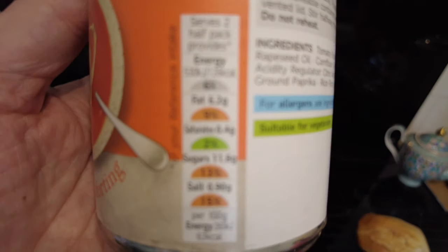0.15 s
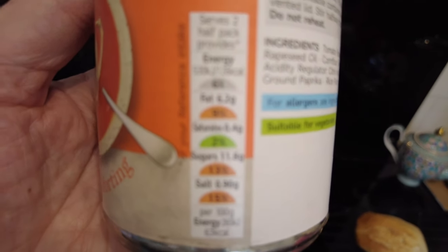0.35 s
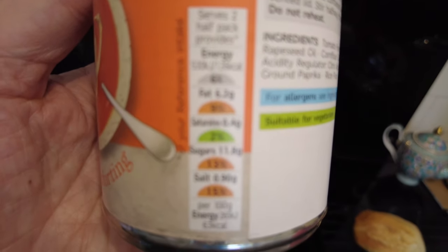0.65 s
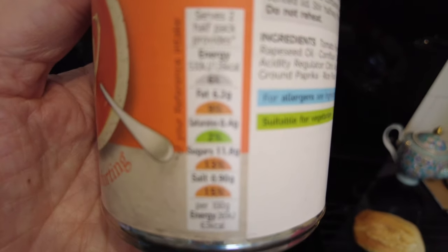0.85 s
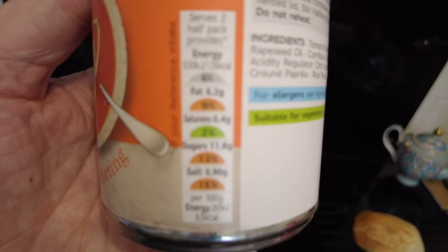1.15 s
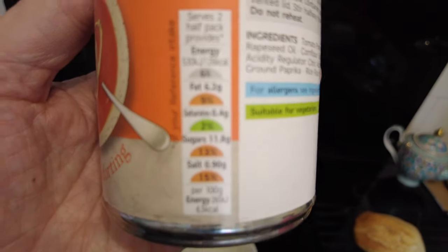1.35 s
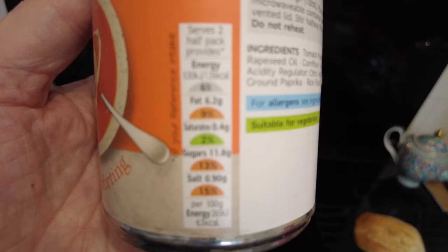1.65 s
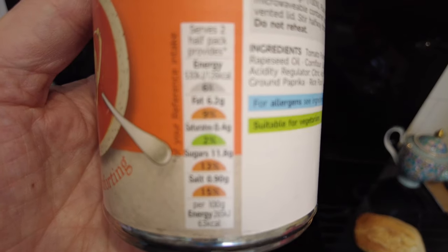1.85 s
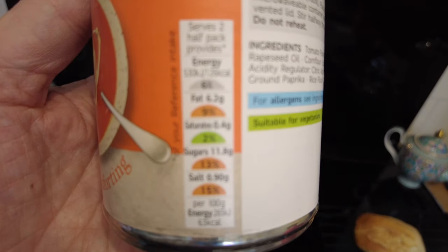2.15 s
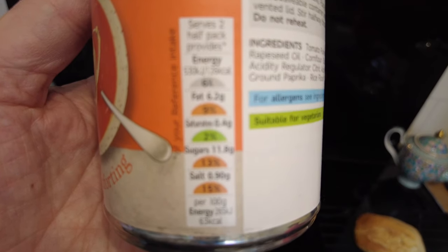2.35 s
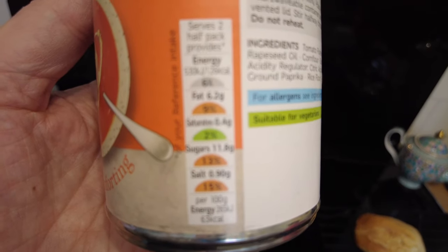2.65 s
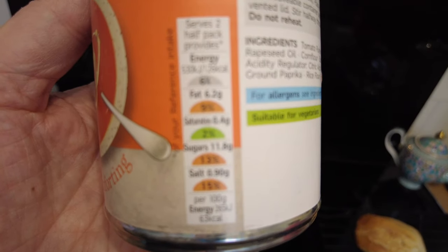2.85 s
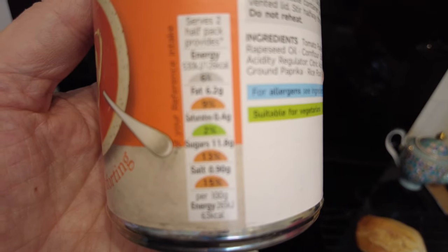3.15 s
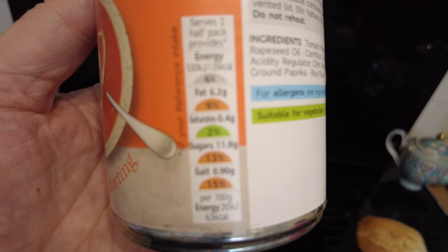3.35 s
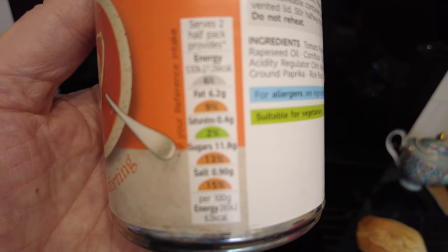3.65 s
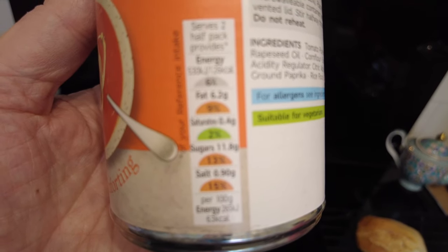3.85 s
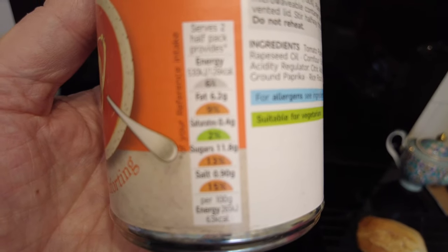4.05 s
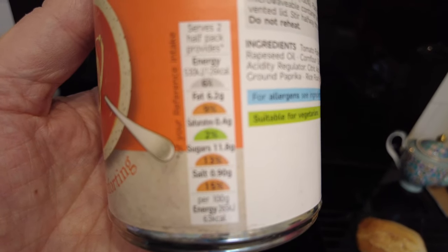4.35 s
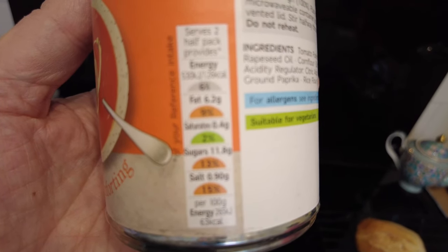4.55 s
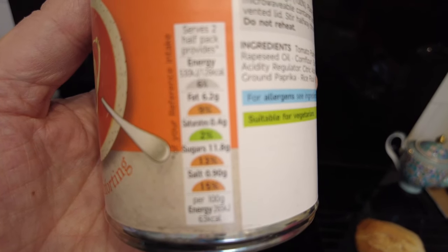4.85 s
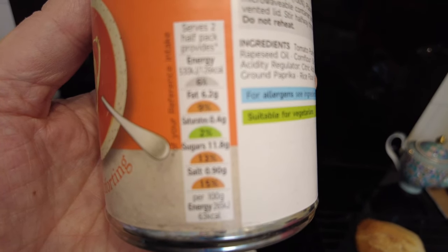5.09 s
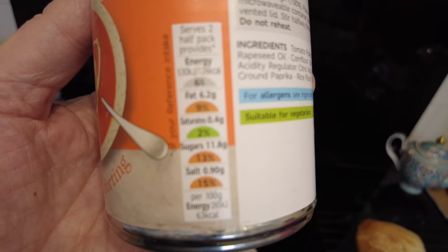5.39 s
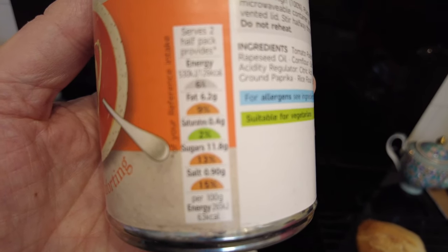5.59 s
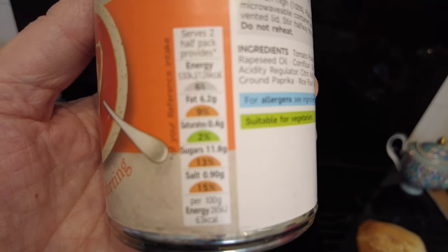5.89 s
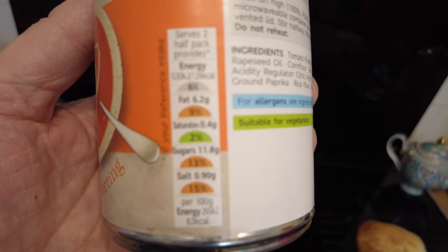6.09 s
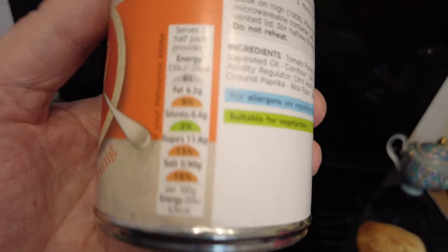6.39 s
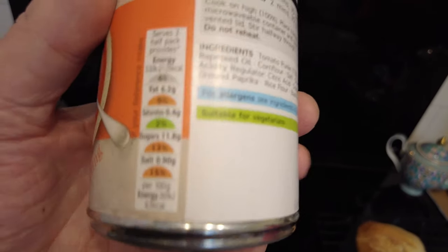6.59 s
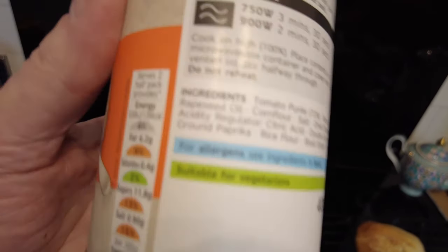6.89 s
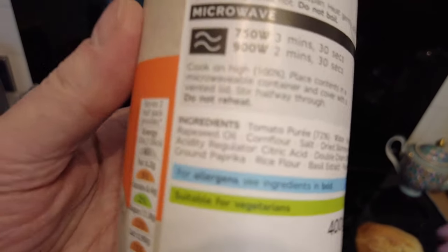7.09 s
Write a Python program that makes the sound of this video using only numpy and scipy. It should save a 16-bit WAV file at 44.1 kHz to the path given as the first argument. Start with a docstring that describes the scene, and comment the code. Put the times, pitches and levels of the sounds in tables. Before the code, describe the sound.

Close, scattered metallic clicks and soft knocks come from a full tin being handled, with a low electrical hum underneath.

```python
"""Light, ringing ticks come from a full soup tin turned slowly in one hand, close by in a small room. Fingers
stick and let go on the paper label, and each release excites the modes of the metal wall. Dull knocks come as
the grip shifts, and the paper label crinkles now and then with short dry clicks. Near the end skin slides over
the label with a soft swish and a dry snap, and the rim sings faintly. A mains hum and a low room rumble lie
under it all."""
import sys
import numpy as np
from scipy import signal
from scipy.fft import rfft, irfft, next_fast_len
from scipy.io import wavfile
from scipy.ndimage import uniform_filter1d

SR = 44100
rng = np.random.default_rng(int(sys.argv[2]) if len(sys.argv) > 2 else 0)


def waveform_to_disk(signal):
    """Save audio, clipped to [-1, 1], as 16-bit WAV at the path in sys.argv[1]."""
    frames = np.transpose(np.atleast_2d(signal))
    scaled = np.clip(frames, -1, 1) * 32767
    samples = np.round(scaled).astype(np.int16)
    wavfile.write(sys.argv[1], SR, samples)


N = 318843
TIME = np.arange(N) / SR
HIT_TIME = np.arange(16384) / SR
TICK_BAND_HZ, KNOCK_BAND_HZ = (1000, 5000), (200, 900)  # bands in which levels are set

# modes of the tin, many in close clusters: f/Hz, level/dB, T60/s
TIN_MODES = [(1292, -5.5, .28), (1497, -9, .11), (1745, -15, .18), (2121, -11, .26), (2213, -11, .18),
             (3144, -12, .2), (3275, -5, .19), (3518, -11, .14), (4725, -1, .15), (4780, -5, .14),
             (4840, -3, .15), (4900, -5, .13), (5800, -16, .25), (6190, -7, .2), (6228, -6, .18),
             (6495, -3, .14), (7980, 3.5, .16), (8027, 6, .17), (8280, .5, .14), (9986, 0, .14),
             (10060, 5, .17), (10370, 0, .13), (12210, 1, .12), (12520, -1, .15), (12980, -3, .14),
             (14680, -6, .13), (15600, -4, .14)]


def ticks(gain_db=16, flex_db=-9, flex_hz=1120, flex_width_hz=320, flex_lead_s=.007):
    """Impulse excitation: each release of skin clicks and rings the metal, the more so the harder it is."""
    # releases: t/s, level/dB, treble/dB, f/Hz of the struck spot, low body/dB, metal ring/dB
    releases = [(0.2424, -32, -21.5, 1400, 7, 5), (0.2672, -31.5, -14.5, 1360, -8, -6),
                (0.562, -40.5, -19, 1600, 7, -10), (.587, -33.5, -19, 1440, -10, -1),
                (.602, -26.5, -14, 8000, -15, -1.5), (1.158, -46.5, 1, 1330, -11, 2),
                (1.202, -45, -1, 4530, -13, -3), (1.580, -34.5, -10, 1390, -12, -4),
                (1.596, -38, -10, 1400, -10, 14), (1.636, -28.5, -11, 1480, -5, 4),
                (1.7017, -16, -15, 1540, 6, -7.5), (1.731, -30, -8, 1500, -9, -3),
                (1.778, -33.5, -18, 2100, -12, 13), (2.128, -28.5, -10, 1560, -7, 2),
                (2.145, -29.5, -10.5, 1710, 22, 15), (2.1757, -15.5, -11.5, 1740, 20.5, 4.5),
                (1.342, -50, 2.5, 1400, -10, 0), (1.422, -43, -10, 5500, -8, -4),
                (1.471, -43, -2, 1400, -6, -4), (2.523, -40, -26, 1500, -6, -2),
                (2.610, -19, -14, 1600, -2, 4), (3.281, -39, -14, 1350, -10, 14),
                (3.3106, -26, -6, 1450, 6, 6), (3.3714, -17, -12.5, 1500, 10, -6),
                (3.640, -41, -4, 1270, -17, 11), (3.656, -36, -3.5, 3300, -7, 4),
                (3.774, -36.5, -22, 3250, -1, 7), (4.348, -33, -15.5, 2140, 0, 7.5),
                (5.226, -39.5, -22, 935, 22, -12), (4.916, -41, -9, 3230, -8, 5),
                (5.165, -32, -7.5, 2420, -14, 3), (5.651, -41, -2.5, 1550, 18, -13),
                (5.520, -53, 5, 1500, -8, -2), (6.025, -45, -4.5, 1300, -14, 1),
                (6.112, -45, 1, 2100, -10, 9), (6.158, -41.5, -19, 1350, -5, -2),
                (6.823, -38, -18, 1290, -15, -9)]
    # spectrum of a click: f/Hz, level/dB
    click_spectrum = [(100, -2), (400, -6), (950, -19.5), (1300, 0), (1700, -5), (2600, -6), (3500, -10),
                      (4200, -9.5), (5000, -11.5), (7000, -10), (11000, -7.5), (16000, -9)]
    flex_spectrum = [(flex_hz / 2, -50), (flex_hz - flex_width_hz / 2, -6), (flex_hz, 0),
                     (flex_hz + flex_width_hz / 2, -6), (flex_hz * 2, -60)]
    # the wall radiates best around its strong upper modes
    wall = humps([(hz, 170, 6) for hz, db, _ in TIN_MODES if hz > 3000 and db > -8])
    out = np.zeros((2, N))
    for s, db, treble, spot_hz, body, metal in releases:
        top_loss_db = .42 * max(db + 32, 0)
        tilt = [(450, 0), (650, body / 2), (1000, body), (1300, 0), (2000, 0),
                (4800, min(treble + 16, 0)), (9000, treble), (10500, treble), (12500, treble - top_loss_db)]
        spot = humps([(spot_hz, 380, 9.5)])
        click = unit_band(colour(crack(), click_spectrum, tilt, wall, spot), TICK_BAND_HZ)
        ringing = colour(ring(TIN_MODES), tilt, spot) * amp(metal + .37 * (db + 11))
        add(out, s, amp(db + gain_db) * unit_band(click + ringing, TICK_BAND_HZ))
        # under a hard grip the wall bows with a brief, low note just before it clicks
        flex = colour(room(direct=0, rise_s=.0039, early=3.2, early_s=.0088), flex_spectrum)
        flex /= np.linalg.norm(flex[0])
        add(out, s - flex_lead_s, amp(db + gain_db + flex_db + min(db + 9.5, 0)) * flex)
    return out * amp([[-.86], [.86]])


def knocks(gain_db=18.5, touch_db=-19, metal_db=-19, crack_db=-6, hollow_db=-2):
    """Soft impact: the longer the contact, the more of the thud's energy lies at low frequencies."""
    # blows: t/s, level/dB, hardness/dB, hollow ring/dB, f/Hz favoured by the spot
    blows = [(0.604, -25, -43, -9, 340), (1.519, -27.5, -51, -8, 320), (2.092, -26, -48, -3.5, 240),
             (2.612, -40, -8.5, 6.5, 377), (2.8052, -15.5, -29.5, 3, 322), (3.087, -31, -42, 1, 535),
             (3.397, -14.5, -28, 1, 487), (3.831, -18, -27, 3.5, 870), (5.673, -29.5, -35.5, -4, 520)]
    # spectrum of the thud: f/Hz, level/dB
    thud_spectrum = [(50, -52), (170, 1.5), (250, -1), (330, 6.5), (460, 1.5), (580, 7.5), (700, -4),
                     (900, 2), (1150, 2.5), (1400, 10), (1900, -5), (2200, 2.5), (2600, -12), (3100, -14.5),
                     (3500, -7), (4200, -29), (4800, -21), (6500, -45), (15000, -56)]
    # the rim's brief crack at the start of a knock: f/Hz, level/dB
    crack_spectrum = [(600, -34), (1500, -2), (2200, 2), (2800, -1), (3400, 0), (4200, -21), (4800, -6),
                      (6000, -25), (15000, -45)]
    # low resonances under a knock: f/Hz, level/dB, T60/s
    hollow_modes = [(117, 0, .3), (242, -9, .35), (323, 2, .25), (380, -13, .4), (481, -4, .24),
                    (549, -4.5, .24), (650, -8, .25), (741, -9, .3), (853, -8, .3), (900, -13, .26),
                    (945, -11, .26), (1030, -16, .2), (1387, -15, .2), (1780, -21, .2)]
    out = np.zeros((2, N))
    for s, db, hardness, hollow, spot_hz in blows:
        gain, treble_db = amp(db + gain_db), hardness + 17.5
        path = room(direct=.12, rise_s=.003, early=.9, early_s=.025, spacing_m=.1)
        low_body = humps([(240, 200, .63 * max(-28 - hardness, 0))])
        thud = colour(path, thud_spectrum, [(450, 0), (1500, treble_db)], low_body)
        touch_path = room(direct=0, rise_s=.00052, early=1, early_s=.02)
        touch = colour(touch_path, [(200, -5), (900, 15), (1400, -3), (2500, -28)])
        metal = colour(ring(TIN_MODES), [(2300, 7.5), (3500, -4), (5000, -5), (7000, -30)])
        edge = colour(crack(), crack_spectrum)
        hollow_ring = colour(ring(hollow_modes, scatter_db=1), humps([(spot_hz, 110, 5)]))
        add(out, s - .01, gain * amp(touch_db) * unit_band(touch, KNOCK_BAND_HZ))
        add(out, s, gain * (unit_band(thud, KNOCK_BAND_HZ) + amp(metal_db) * metal))
        add(out, s + .0025, gain * amp(crack_db + treble_db) * unit_band(edge, TICK_BAND_HZ))
        add(out, s + .00641, gain * amp(hollow_db + hollow) * hollow_ring)
    return np.array([np.roll(out[0], 18), out[1]])  # arrives 18 samples later on the left


def cricks(gain_db=16):
    """Damping broadens resonances: the paper label crinkles under a fingertip and clicks with no long ring."""
    # crinkles of the label: t/s, level/dB, treble/dB
    crinkles = [(4.686, -39, -23), (4.939, -29.5, -9), (4.9796, -25, -3.5)]
    # spectrum of a crick: f/Hz, level/dB
    spectrum = [(300, -17), (1000, -21), (1250, 4.5), (1800, -3.5), (2000, -8.5), (4500, -10),
                (9000, -17.5), (16000, -19)]
    # resonances of the crinkling label: f/Hz, width/Hz, level/dB
    resonances = [(1600, 400, 7.5), (2600, 600, 6), (6100, 340, 15.5), (7650, 400, 11)]
    out = np.zeros((2, N))
    for s, db, treble in crinkles:
        crick = colour(crack(), spectrum, humps(resonances), [(2000, 0), (6000, treble)])
        add(out, s, amp(db + gain_db) * unit_band(crick, TICK_BAND_HZ))
    return out


def grip(gain_db=-3, slips_per_s=110, spread_db=4, ring_db=-13, spots=6):
    """Stick-slip friction: skin creeps over the paper in tiny random slips that faintly ring the tin."""
    # spells of creeping: start t/s, end t/s, level/dB
    creeps = [(.01, .03, -54), (.40, .46, -55.5), (1.20, 1.23, -53), (1.34, 1.48, -55), (1.645, 1.66, -46),
              (1.74, 1.79, -50), (2.44, 2.59, -52.5), (2.74, 2.75, -53.5), (3.04, 3.06, -60),
              (3.20, 3.25, -50), (3.28, 3.38, -45.5), (3.68, 3.84, -57.5), (4.19, 4.23, -58),
              (5.02, 5.09, -54.5), (5.56, 5.60, -55), (5.79, 5.82, -56.5), (6.08, 6.18, -51),
              (6.79, 6.85, -50.5)]
    # spectrum of a slip: f/Hz, level/dB
    spectrum = [(300, -31), (900, 3.5), (1400, 8), (3000, 1), (7000, -3.5), (12000, -9), (16000, -5)]
    onsets = rng.random(N) < slips_per_s / SR
    slips = onsets * amp(spread_db * np.minimum(rng.exponential(1, N), 3.5))
    spot, out = rng.integers(0, spots, N), 0
    for k in range(spots):
        path = colour(room(direct=.4, rise_s=.00095, early=1, early_s=.018), spectrum)
        response = path / np.linalg.norm(path[0]) + amp(ring_db) * ring(TIN_MODES)
        out = out + signal.oaconvolve((slips * (spot == k))[None], response, axes=1)[:, :N]
    return amp(gain_db) * strokes(creeps, rise_db_per_s=227, fall_db_per_s=165) * unit(out)


def slide(gain_db=5):
    """Sliding friction: dry skin on smooth paper makes a fine, bright hiss."""
    # strokes over the label: start t/s, end t/s, level/dB
    swishes = [(6.46, 6.54, -48.5), (7.0, 7.12, -54.5)]
    # spectrum of the friction noise: f/Hz, level/dB
    spectrum = [(500, -15), (2000, -8.5), (4500, -11), (8000, -8), (12000, -5), (14200, -2.5),
                (15500, -1.5)]
    hiss = unit(colour(rng.standard_normal((2, N)), spectrum))
    envelope = strokes(swishes, rise_db_per_s=103, fall_db_per_s=90)
    return amp(gain_db) * envelope * hiss * amp([[.3], [-.3]])


def snap(at_s=6.5248, gain_db=-7.5):
    """Sudden release: the label lets go of the sliding finger, too lightly to ring the tin."""
    # spectrum of the thin, dry snap: f/Hz, level/dB
    spectrum = [(500, -32), (3900, -21), (5000, -3), (6200, 1), (7000, -9), (8700, -4), (10000, -15),
                (16000, -14)]
    out = np.zeros((2, N))
    path = room(direct=1.9, rise_s=.002, early=6, early_s=.007)
    add(out, at_s, amp(gain_db) * colour(path, spectrum))
    return out


def rim(modes_hz=(1292, 2105), width_hz=16, side_share=.4, ping_db=25, t60_share=.85):
    """Forced and free vibration: friction drives two modes; a catching fingertip leaves a damped ping."""
    # a finger dragging on the rim: start t/s, end t/s, level/dB
    drags = [(6.09, 6.27, -60), (6.82, 6.84, -60)]
    # fingertips catching the rim: t/s, level/dB
    catches = [(.269, -48), (.604, -39.5), (6.031, -52), (6.088, -55), (6.118, -54), (6.165, -50),
               (6.2, -52), (6.247, -48), (6.263, -40), (6.511, -47.5)]
    # a soft fingertip stirs mostly the lowest mode: f/Hz, level/dB
    ping_spectrum = [(1000, 13), (1340, 12), (1480, -3), (2100, -3), (3250, -6), (3550, -3), (4700, -11),
                     (6300, -12), (8000, -22), (15000, -36)]
    radius, singing = np.exp(-np.pi * width_hz / SR), 0
    for hz in modes_hz:
        resonator = [1, -2 * radius * np.cos(2 * np.pi * hz / SR), radius ** 2]
        singing = singing + unit(signal.lfilter([1, 0, -1], resonator, rng.standard_normal((2, N))))
    mid, side = singing
    envelope = strokes(drags, rise_db_per_s=250, fall_db_per_s=253)
    out = envelope * (mid + side_share * np.array([side, -side]))
    damped = [(hz, db, t60 * t60_share) for hz, db, t60 in TIN_MODES]
    for s, db in catches:
        add(out, s, amp(db + ping_db) * colour(ring(damped, scatter_db=.5, apart=.4), ping_spectrum))
    return out


def ring(modes, detune=.002, scatter_db=2.2, apart=1, rise_s=.0025):
    """Modal decay: damped sines, varying in strength with each blow and bent in pitch by the grip."""
    t, out = HIT_TIME, 0
    for hz, db, t60 in modes:
        # short waves reach the two microphones differently, long ones alike
        mic_phase, mic_db = apart * min(hz / 1200, 2) * rng.uniform(-1, 1, (2, 2, 1))
        strength = amp(db + scatter_db * rng.standard_normal() + mic_db)
        turns = hz * (1 + detune * rng.uniform(-1, 1)) * t + rng.random()
        out = out + strength * amp(-60 * t / t60) * np.sin(2 * np.pi * turns + mic_phase)
    out = out * (1 - np.exp(-t / rise_s))
    return out / np.sqrt((out ** 2).sum() / 2)


def crack(echo_s=.0043, echo_gain=.63):
    """Reflection: a sharp release of the wall sounds in the room and echoes off the hand behind the tin."""
    click, echo = (room(direct=.3, rise_s=.0016, early=2, early_s=.009) for _ in range(2))
    add(click, echo_s, echo_gain * colour(echo, [(3000, 0), (6000, .5), (12000, -1)]))
    return click


def room(direct, rise_s, early, early_s, spacing_m=.22):
    """Impulse response of the room: direct sound, a cluster of near reflections and a short tail."""
    # reverberation time: f/Hz, T60/s
    decay_times = [(150, 0.22), (500, 0.31), (1500, 0.28), (5000, 0.32), (15000, 0.37)]
    t = HIT_TIME
    field = diffuse(rng.standard_normal((2, len(t))), spacing_m)
    hz, frame_s, frames = signal.stft(field, SR, nperseg=256)
    decay = amp(-60 * frame_s / read(decay_times, hz)[:, None])
    tail = signal.istft(frames * decay, SR, nperseg=256)[1][:, :len(t)]
    tail *= (1 - np.exp(-t / rise_s)) * (1 + early * np.exp(-t / early_s))
    # the first reflections arrive in separate clumps, the later ones merge
    clumps = unit(uniform_filter1d(rng.standard_normal(len(t)), size=30))
    tail *= amp(3.5 * clumps * np.exp(-t / .04))
    tail /= np.linalg.norm(tail[0])
    tail[[0, 1], [4, 0]] += direct  # arrives four samples earlier on the right
    return tail


def hum(hum_hz=100.15):
    """Forced vibration: an appliance hums at twice the mains frequency, almost a pure tone."""
    # partials: multiple of the hum frequency, level/dB
    partials = [(.5, -26), (1, 0), (2, -27), (3, -38), (5, -36)]
    # slight wavering of the hum: t/s, level/dB
    wavering = [(0.05, -32.5), (0.33, -30.5), (2.62, -32), (5.07, -31), (6.04, -32.5), (6.36, -30.5),
                (7.15, -32)]
    t = TIME - np.array([[.0005], [0]])  # arrives first on the right
    tone = sum(amp(db) * np.sin(2 * np.pi * (k * hum_hz * t + rng.random())) for k, db in partials)
    return amp(np.interp(TIME, *np.transpose(wavering))) * unit(tone)


def air(base_db=-52.5, gain_db=1):
    """Diffuse background noise: steady room rumble and a faint hiss."""
    # relative spectral density: f/Hz, level/dB
    spectrum = [(10, -7), (22, 5.5), (43, -15), (65, -10.5), (140, -16.5), (175, -20.5), (300, -20.5),
                (450, -25), (650, -32.5), (1300, -37.5), (2200, -43.5), (4000, -48), (8000, -53),
                (15000, -61)]
    size = next_fast_len(N)
    shape = amp(read(spectrum, np.fft.rfftfreq(size, 1 / SR)))
    noise = irfft(rfft(diffuse(rng.standard_normal((2, size)))) * shape, size)
    return amp(base_db + gain_db) * np.sqrt(size) * unit_band(noise, (218, 15000))[:, :N]


def diffuse(x, spacing_m=.22, bass_coherence=.975):
    """Diffuse-field coherence: two microphones get like signals in the bass, unrelated ones above."""
    half_waves = 2 * np.fft.rfftfreq(x.shape[1], 1 / SR) * spacing_m / 343
    coherence = bass_coherence * np.sinc(half_waves)
    mid, side = rfft(x) * np.sqrt([(1 + coherence) / 2, (1 - coherence) / 2])
    return irfft([mid + side, mid - side], x.shape[1])


def strokes(rows, rise_db_per_s, fall_db_per_s):
    """Power sum of envelopes: each stroke swells up to its start, holds until its end, then dies away."""
    power = 0
    for start, end, db in rows:
        drop_db = rise_db_per_s * np.clip(start - TIME, 0, 1) + fall_db_per_s * np.clip(TIME - end, 0, 1)
        power = power + amp(db - drop_db) ** 2
    return np.sqrt(power)


def colour(x, *spectra, size=4096):
    """Minimum-phase filter whose dB response is the sum of the spectra."""
    hz = abs(np.fft.fftfreq(size, 1 / SR))
    log_gain = np.log(amp(sum(read(points, hz) for points in spectra)))
    taps = np.fft.ifft(np.exp(np.conj(signal.hilbert(log_gain)))).real
    return signal.fftconvolve(x, taps[None, :size // 2], axes=1)[:, :x.shape[1]]


def humps(peaks):
    """Resonance curves (f/Hz, width/Hz, level/dB) as one spectrum (f/Hz, level/dB)."""
    hz = np.linspace(0, SR / 2, 2048)
    curves = [db / (1 + (2 * (hz - f) / width) ** 2) for f, width, db in peaks]
    return np.transpose([hz, np.max(curves, axis=0)])


def read(points, hz):
    """Linear interpolation over log frequency."""
    f, value = np.transpose(points)
    return np.interp(np.log(hz + 1), np.log(f + 1), value)


def unit_band(x, band_hz):
    """Normalises by the energy in one band, averaged over the channels."""
    hz = np.fft.rfftfreq(x.shape[1], 1 / SR)
    in_band = rfft(x)[:, (hz > band_hz[0]) & (hz < band_hz[1])]
    return x / np.sqrt((abs(in_band) ** 2).sum() / x.shape[1])


def unit(x):
    """Scales to an rms of one."""
    return x / np.sqrt(np.mean(x ** 2) + 1e-20)


def amp(db):
    """Decibels to amplitude ratio."""
    return 10 ** (np.asarray(db) / 20)


def add(mix, s, sound):
    """Superposes a stereo sound on the mix at s seconds."""
    part = mix[:, max(round(s * SR), 0):][:, :sound.shape[1]]
    part += sound[:, :part.shape[1]]


def scene():
    """Superposition: the handled tin over the hum of the room."""
    return ticks() + cricks() + knocks() + grip() + slide() + snap() + rim() + hum() + air()


def record(dry):
    """Band limiting: a steep low-pass at 15.9 kHz."""
    lowpass = signal.firwin(511, 15900, window=("kaiser", 9), fs=SR)
    return signal.oaconvolve(dry, lowpass[None], "same")


dry = scene()
out = record(dry)
waveform_to_disk(out)
```